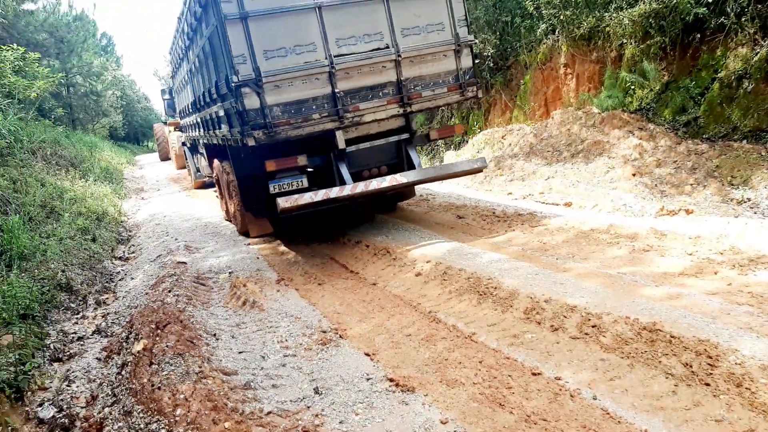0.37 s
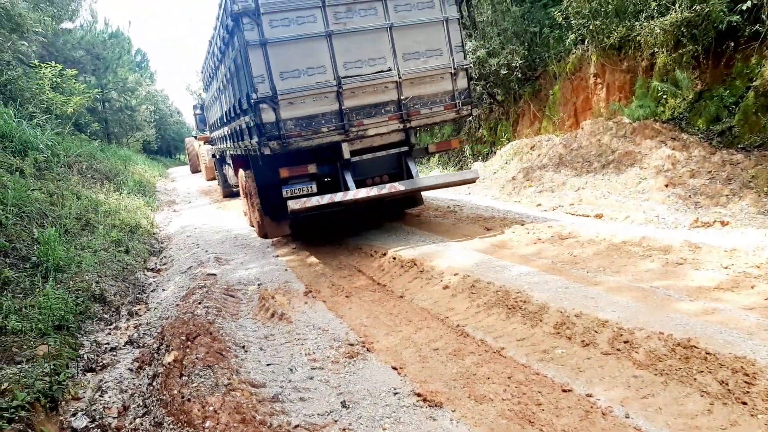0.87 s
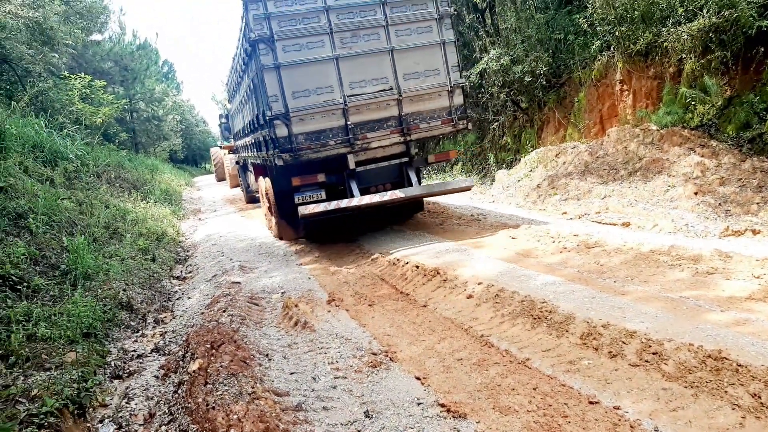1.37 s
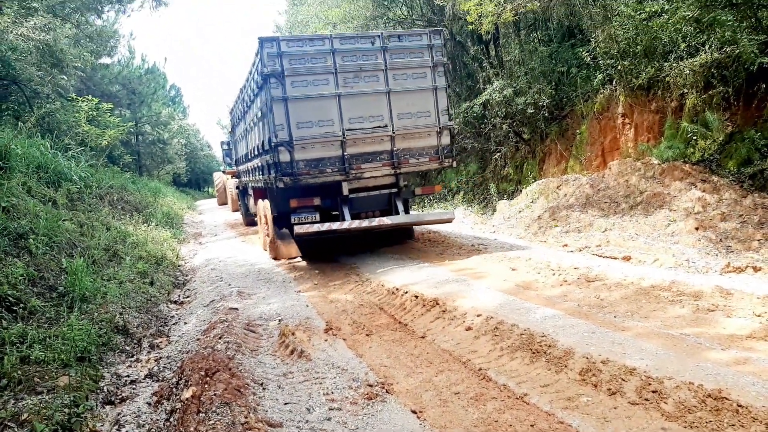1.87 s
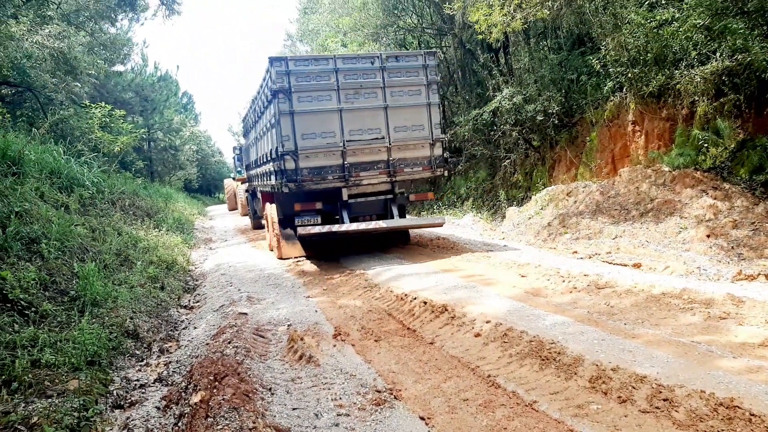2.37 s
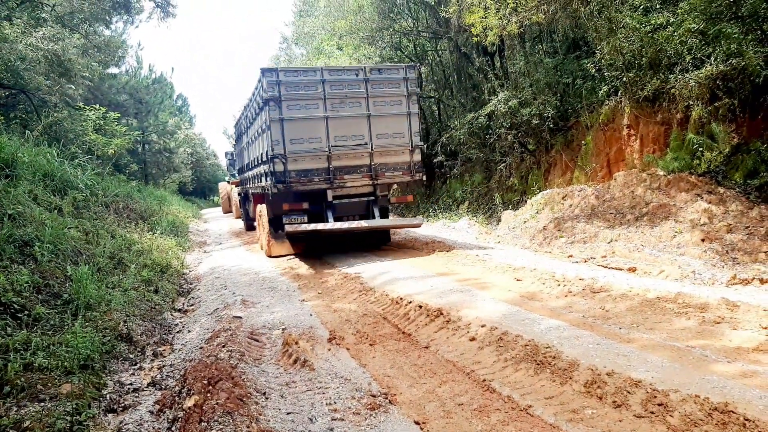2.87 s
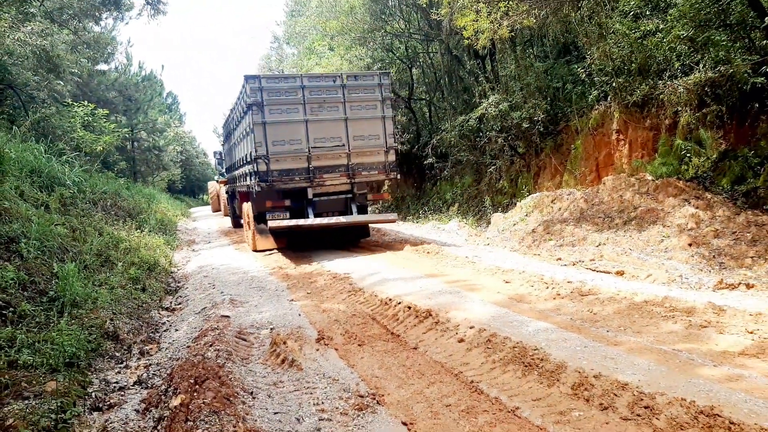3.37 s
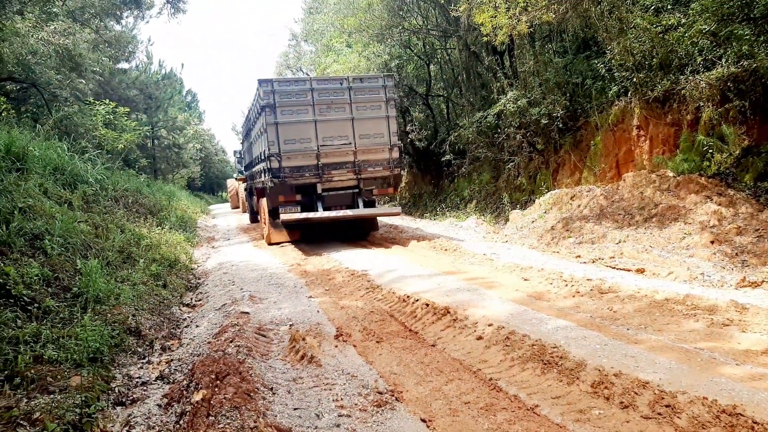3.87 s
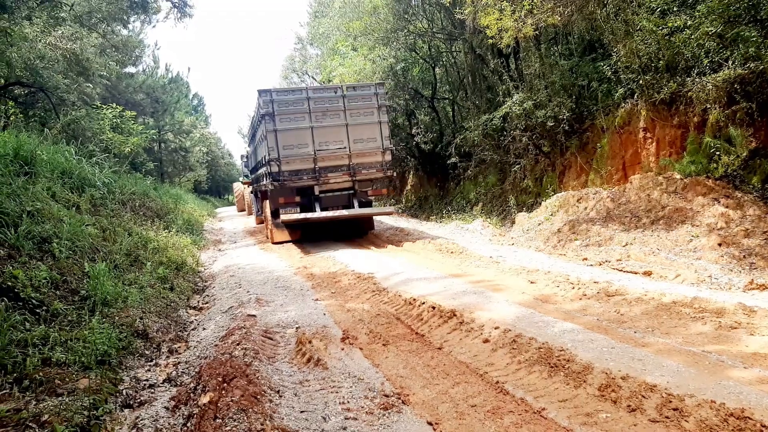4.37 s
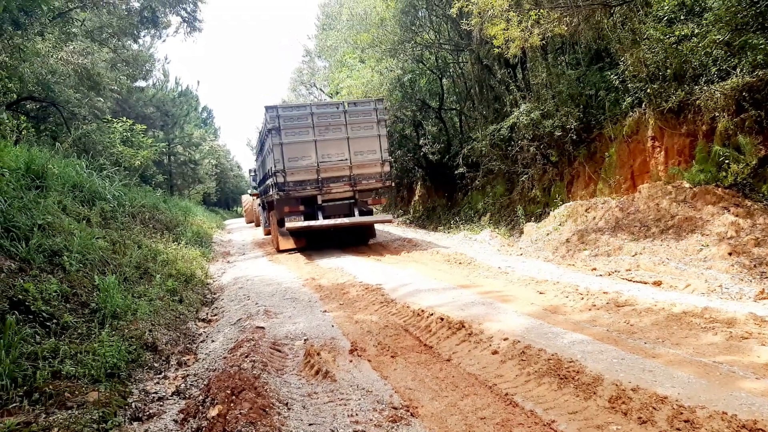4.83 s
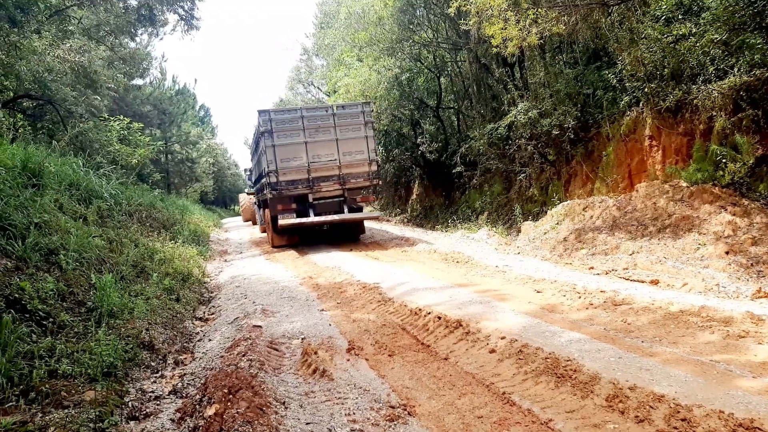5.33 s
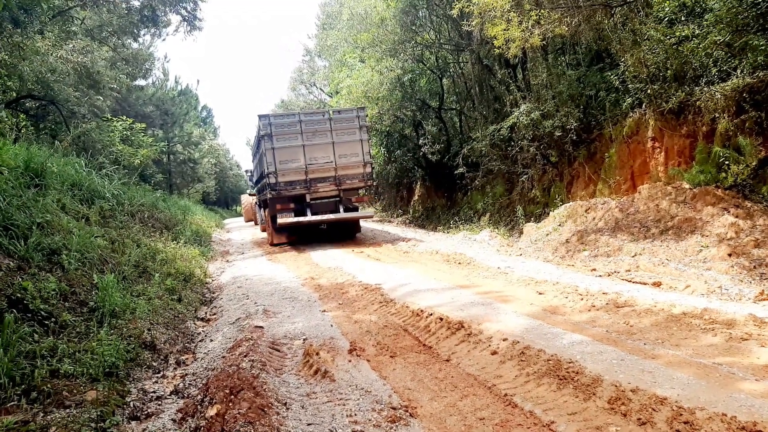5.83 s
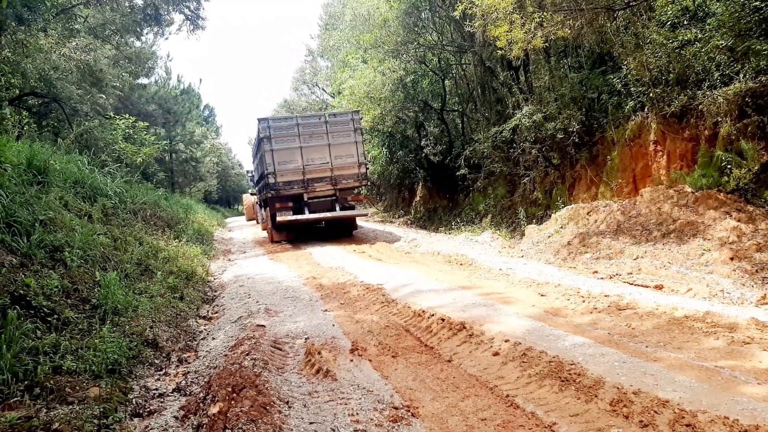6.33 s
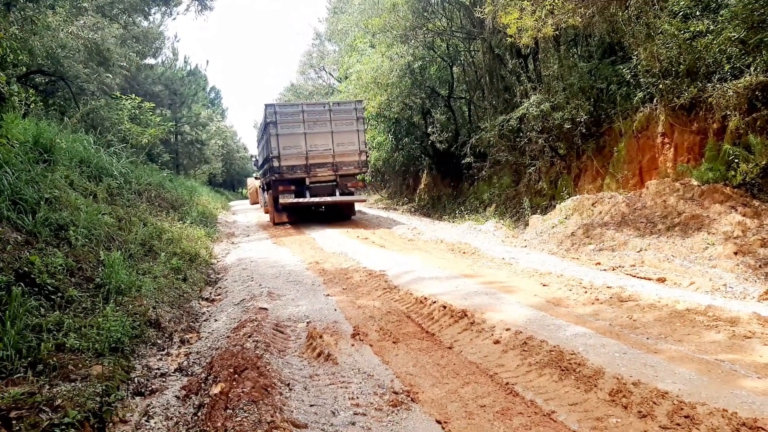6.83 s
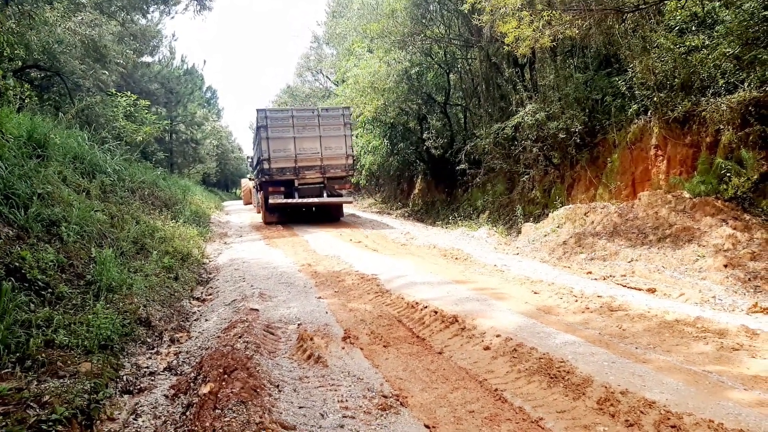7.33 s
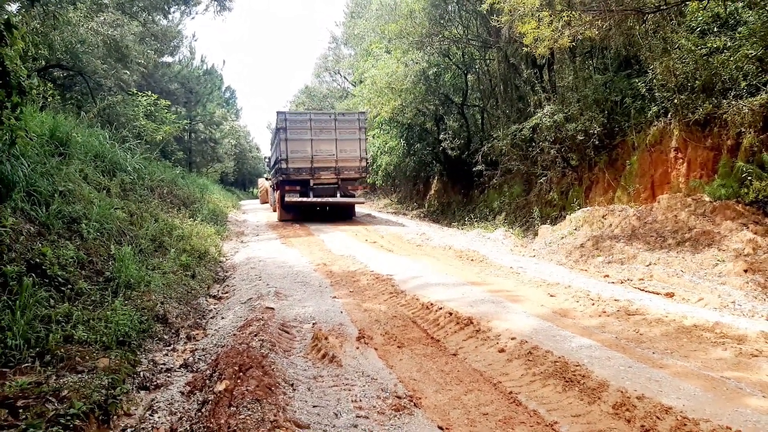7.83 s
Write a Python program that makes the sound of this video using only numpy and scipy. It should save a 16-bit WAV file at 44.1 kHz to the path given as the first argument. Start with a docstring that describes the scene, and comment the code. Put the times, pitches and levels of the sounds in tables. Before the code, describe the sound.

A loaded diesel truck's deep exhaust boom surges up and down as it is towed away over wet grit, clattering, hissing and squeaking.

```python
"""A loaded six-cylinder diesel truck's exhaust booms and surges as it is towed away up a dirt road
between a bank and trees: sines at multiples of a varying firing rate. The towing engine ahead holds
a steady high speed as sines on its crankshaft multiples. Patchy coloured noise makes rumble, roar,
clatter and the hiss of tyres in wet grit; narrow noise makes gear whines; short tones make squeaks,
decaying sines a clank and noise bursts rattles."""
import sys
import numpy as np
from scipy import signal
from scipy.fft import rfft, irfft
from scipy.io import wavfile
from scipy.ndimage import uniform_filter1d

SR = 44100
rng = np.random.default_rng(int(sys.argv[2]) if len(sys.argv) > 2 else 0)


def boost(x):
    """Linear amplitude factor 10**(x/20) for a level x in decibels (scalar or array-like)."""
    u = np.asarray(x, float) / 20
    return 10 ** u


def generate_wav(sig):
    """Save sig (samples, or channels by samples) to the path in sys.argv[1] as 16-bit PCM at SR."""
    pcm = np.round(np.clip(np.atleast_2d(sig).T, -1, 1) * 32767).astype(np.int16)
    wavfile.write(sys.argv[1], SR, pcm)


N = 351036  # samples


def in_time(rows):
    """Interpolates the columns of a time curve to every sample."""
    s, *columns = np.transpose(rows)
    return [np.interp(np.arange(N) / SR, s, column) for column in columns]


def at_hz(points, hz):
    """Reads a spectrum, given as (Hz, value) points, on a log-frequency axis."""
    point_hz, value = np.transpose(points)
    return np.interp(np.log(np.maximum(hz, 1)), np.log(point_hz), value)


def rms_one(x):
    """Scales to rms 1."""
    return x / np.sqrt(np.mean(x ** 2) + 1e-20)


def drift(rate_hz):
    """Slow random signal of rms about 1: noise through two equal poles at rate_hz."""
    step, settle = 40, 4000  # samples per slow value, slow values discarded
    r = np.exp(-2 * np.pi * rate_hz * step / SR)
    white = rng.standard_normal(N // step + settle + 2)
    slow = signal.lfilter([1], [1, -2 * r, r * r], white)[settle:]
    return np.interp(np.arange(N) / step, np.arange(len(slow)), rms_one(slow - slow.mean()))


def pair():
    """Spectra of two white noises, as alike as the two microphones hear the distant scene."""
    # Each row: frequency in Hz, left-right likeness from 0 to 1.
    likeness = [(60, .99), (160, .95), (270, .86), (450, .78), (740, .68), (1100, .35), (2500, .2),
                (3500, .04), (15000, .02)]
    mid, side = rfft(rng.standard_normal((2, N)))
    alike = np.clip(at_hz(likeness, np.fft.rfftfreq(N, 1 / SR)), 0, 1)
    return np.sqrt(1 + alike) * mid + np.sqrt(1 - alike) * side * [[1], [-1]]


def resonant_noise(white, centre_hz, width_hz):
    """Noise twice through a resonance, width_hz wide at half amplitude; rms 1."""
    hz = np.fft.rfftfreq(N, 1 / SR)
    return rms_one(irfft(white / (1 + (2 * (hz - centre_hz) / width_hz) ** 2), N))


def patchy_noise(colour, patchy_db, count):
    """Coloured stereo noise cut into overlapping bands that each flicker on their own; rms 1."""
    hz = np.fft.rfftfreq(N, 1 / SR)
    spectrum = pair() * boost(at_hz(colour, hz))
    place = np.interp(np.log(hz + 1), np.log([colour[1][0], colour[-2][0]]), [0, count - 1])
    out = 0
    for k in range(count):
        share = np.clip(1 - abs(place - k), 0, 1)
        out = out + irfft(spectrum * share, N) * boost(patchy_db * drift(11.0))
    return rms_one(out)


def line(turns, level_db, waver_db, wander_rad):
    """A sine of given rms whose level and phase waver on the way through the air."""
    level = np.sqrt(2) * boost(level_db + waver_db * drift(2.5))
    return level * np.sin(2 * np.pi * turns + wander_rad * drift(2.5))


def truck_exhaust():
    """The firing rate and its multiples, with weaker lines between them from unequal cylinders."""
    # Truck engine. Each row: time in seconds, firing rate in Hz, boom rms in dB.
    truck = [(0, 47.2, -23.5), (.28, 44.35, -23.5), (.54, 41.3, -27.5), (.75, 43.8, -22),
             (1.05, 49.04, -18), (1.3, 54.3, -19), (1.54, 61.8, -19.5), (1.85, 67.6, -24),
             (2.17, 71.6, -23), (2.45, 68.9, -21.5), (2.66, 69, -20), (2.92, 66, -20), (3.1, 63, -16),
             (3.42, 59.4, -16), (3.7, 65.9, -18), (3.98, 70.4, -26), (4.25, 66.2, -19), (4.6, 58.3, -16),
             (4.92, 51.83, -20), (5.25, 49.66, -26), (5.46, 51.3, -22), (5.64, 49.2, -28), (5.9, 53, -21.5),
             (6.16, 58.2, -17), (6.5, 62.1, -17), (6.75, 65.6, -18.5), (7.1, 56, -19.5), (7.3, 59.8, -19),
             (7.54, 66.46, -18.5), (7.8, 67.6, -19.5), (7.96, 70.8, -17.5)]
    # Exhaust pipe resonances favour the 2nd multiple.
    # Each row: frequency of the multiple in Hz, its rms in dB before the fade.
    pipe_second = [(84, -31), (95, -33), (105, -41.5), (115, -41), (124, -32.5), (134, -25), (143, -26)]
    # The same for the 3rd multiple. Each row: frequency in Hz, rms in dB before the fade.
    pipe_third = [(125, -34.5), (143, -32.5), (160, -33.5), (178, -33), (195, -40.5), (213, -38.5)]
    # Weaker lines: between the multiples from unequal cylinders, plus the fading 4th and 5th multiples.
    # Each row: sixths of the firing rate, rms in dB at the start, rms in dB at the end.
    weak_lines = [(4, -56, -60), (5, -50, -54), (7, -52, -52), (8, -48, -50), (10, -45, -48),
                  (14, -49, -50), (16, -45, -45), (24, -39, -80), (30, -44, -95)]
    second_fade_db, third_fade_db = -6.5, -9  # lost with distance by the end
    pulse_slant_turns = .38  # lead of the 2nd multiple: pulses rise slowly and drop fast
    firing_hz, boom_db = in_time(truck)
    turns = np.cumsum(firing_hz) / SR
    second_db = at_hz(pipe_second, 2 * firing_hz) + np.linspace(0, second_fade_db, N)
    third_db = at_hz(pipe_third, 3 * firing_hz) + np.linspace(0, third_fade_db, N)
    out = line(turns, boom_db, waver_db=.3, wander_rad=.05)
    out += line(2 * turns + pulse_slant_turns, second_db, waver_db=1.5, wander_rad=.2)
    out += line(3 * turns, third_db, waver_db=2.0, wander_rad=.3)
    for sixths, start_db, end_db in weak_lines:
        level_db = np.linspace(start_db, end_db, N)
        out += line(turns * sixths / 6, level_db, waver_db=4.0, wander_rad=.8)
    return out, turns


def towing_engine():
    """Crankshaft multiples of the governed engine ahead, its speed nearly steady."""
    # The 6th crankshaft multiple swells as the engine takes the load.
    # Each row: time in seconds, rms in dB.
    sixth_multiple = [(0, -43.5), (1.05, -36), (1.4, -36.5), (1.75, -52), (2.45, -51), (2.8, -36.5),
                      (3.45, -55), (3.85, -43), (5.25, -39.5), (6.3, -29.5), (6.65, -31.5), (7.35, -32.5),
                      (7.96, -36.5)]
    # Other multiples. Each row: crankshaft multiple, rms in dB at the start, rms in dB at the end.
    other_multiples = [(3, -44, -41.5), (4, -44, -55), (5, -57, -38.5), (8, -44.5, -53), (9, -44, -64.5)]
    crank_hz, firings_per_turn = 37.45, 3
    turns = np.cumsum(crank_hz * (1 + 0.002095 * drift(0.49))) / SR
    out = line(6 * turns, in_time(sixth_multiple)[0], waver_db=.6, wander_rad=.2)
    for multiple, start_db, end_db in other_multiples:
        level_db = np.linspace(start_db, end_db, N)
        out += line(multiple * turns, level_db, waver_db=3, wander_rad=.4)
    return out, firings_per_turn * turns


def low_rumble(swing_db):
    """Low noise that follows part of the slow swing of the clatter level."""
    # Each row: frequency in Hz, relative density in dB per Hz.
    colour = [(20, -1), (33, -2), (42, 7), (60, 10.5), (90, 9), (170, 12), (230, 6.5), (310, 3), (400, -9),
              (600, -26)]
    smooth_s = .6
    slow_db = uniform_filter1d(swing_db, round(smooth_s * SR))
    return boost(-34.5 + .6 * slow_db) * patchy_noise(colour, patchy_db=-0.25, count=4)


def exhaust_roar(swing_db):
    """Mid-low exhaust noise that follows part of the clatter's swing."""
    # Each row: frequency in Hz, relative density in dB per Hz.
    colour = [(220, -60), (380, -2.5), (499, 1.5), (586, 4.5), (863, -2), (1050, -12), (1360, -9),
              (2310, -120)]
    return boost(-40 + 0.73 * swing_db) * patchy_noise(colour, patchy_db=1.83, count=3)


def combustion_clatter(clatter_db, firing):
    """Mid-band noise pulsing slightly at each firing."""
    # Each row: frequency in Hz, relative density in dB per Hz.
    colour = [(590, -45), (1000, -3.5), (1510, -1), (1820, -3), (2020, -0.5), (2200, -4.5), (3100, -13.5),
              (4030, -45), (6820, -120)]
    return boost(clatter_db) * patchy_noise(colour, patchy_db=1.14, count=4) * firing


def tyre_hiss(hiss_db, firing):
    """Tyres in wet grit: high noise pulsing less at each firing than the clatter."""
    # Each row: frequency in Hz, relative density in dB per Hz.
    colour = [(1800, -4.5), (2800, 0), (3350, -2), (4210, 1), (5500, 1), (7200, -3.5), (8000, -9),
              (9000, -14.5), (10000, -28)]
    return boost(hiss_db) * patchy_noise(colour, patchy_db=0.98, count=4) * firing ** 0.58


def fine_spray(hiss_db):
    """The finest spray: top-band noise that dies faster with distance than the hiss below it."""
    # Each row: frequency in Hz, relative density in dB per Hz.
    colour = [(7000, -40), (8800, -8), (10300, -5.5), (11800, 2.5), (13000, -6), (15600, -9.5),
              (16500, -11)]
    spray_db = 1.6 * (hiss_db + 39.5) - 55
    return boost(spray_db) * patchy_noise(colour, patchy_db=2.0, count=3)


def whines():
    """Gear whines and panel rings: noise twice through narrow resonances, hoarse and wavering."""
    # Each row: frequency in Hz, width in Hz, level in dB at the start, level in dB at the end.
    resonances = [(508, 46, -49, -53), (1290, 26, -50.5, -52.5), (1530, 50, -44, -51), (2052, 34, -45, -51)]
    waver_db = 1.3
    white, out = pair(), 0
    for centre_hz, width_hz, start_db, end_db in resonances:
        level_db = np.linspace(start_db, end_db, N) + waver_db * drift(8.3)
        out = out + boost(level_db) * resonant_noise(white, centre_hz, width_hz)
    return out


def squeaks():
    """Stick-slip in the truck's body joints: short thin tones with a randomly walking phase."""
    # Each row: start in seconds, frequency in Hz, peak in dB.
    tones = [(.14, 4345, -36), (.265, 2460, -32), (.28, 2050, -33), (.315, 1025, -32), (.38, 2490, -35),
             (.385, 2050, -33), (.395, 4650, -39), (.43, 1850, -33), (.455, 4345, -39), (.46, 3530, -40),
             (.82, 5630, -40), (1.04, 4995, -38), (1.04, 3960, -38), (1.06, 4735, -39), (1.14, 1810, -33),
             (1.145, 4565, -41), (1.15, 6890, -44), (1.16, 2050, -33), (1.56, 680, -34), (2.25, 605, -36),
             (3.8, 2050, -39), (6.96, 1295, -36), (7.01, 600, -36)]
    n = round(0.056 * SR)  # tone length
    t = np.arange(n) / SR
    out = np.zeros(N)
    for start_s, hz, peak_db in tones:
        walk = np.cumsum(rng.standard_normal(n))
        i = round(start_s * SR)
        phase = 2 * np.pi * hz * t + .012 * walk
        out[i:i + n] += boost(peak_db) * np.hanning(n) ** .5 * np.sin(phase)
    return out


def clank():
    """Metal on metal: each tick is a broad short ring that sets the body's modes sounding."""
    # Each row: start in seconds, gain in dB.
    ticks = [(1.1008, -13), (1.1164, -8)]
    # Body modes. Each row: frequency in Hz, starting level in dB before the tick gain, t60 in seconds.
    modes = [(1295, -13, .09), (1550, -22, .07), (1770, -21, .07), (2300, -24, .07), (2590, -19, .13)]
    tick_hz, decay_s, rise_s = 1800, .0006, .0004
    out, t = np.zeros(N), np.arange(SR // 4) / SR
    blow = np.sin(2 * np.pi * tick_hz * t) * np.exp(-t / decay_s) * np.tanh(t / rise_s) ** 2
    for hz, level_db, t60_s in modes:
        blow = blow + boost(level_db - 60 * t / t60_s) * np.sin(2 * np.pi * hz * t)
    for start_s, gain_db in ticks:
        i = round(start_s * SR)
        out[i:i + len(t)] += boost(gain_db) * blow
    return out


def rattles():
    """The body rattles over ruts: bursts of rough noise in the panels' broad ring."""
    # Each row: centre in seconds, length in seconds, level in dB at the centre.
    bursts = [(4.527, 0.073, -37), (6.178, 0.17, -36), (7.002, 0.23, -37), (7.65, 0.15, -36.5)]
    t = np.arange(N) / SR
    ring = resonant_noise(pair(), centre_hz=1330, width_hz=560)
    swell = np.zeros(N)
    for centre_s, length_s, level_db in bursts:
        swell += boost(level_db) * np.cos(np.pi * np.clip((t - centre_s) / length_s, -.5, .5))
    return ring * swell * boost(-1.5 * drift(40.0))


def scene():
    """Both engines, the broad layers and the body noises; clatter and hiss pulse with the firing."""
    # Broad layers fade with distance and swell over ruts.
    # Each row: time in seconds, clatter level in dB, tyre hiss level in dB.
    broad = [(0, -33, -33.5), (.11, -32, -31.5), (.22, -33.5, -35.5), (.31, -31, -31), (.37, -32.5, -33.5),
             (.43, -29.5, -32), (.68, -34.5, -37.5), (.86, -32, -34), (.97, -32.5, -38.5),
             (1.12, -35, -33.5), (1.26, -33, -39), (1.45, -36.5, -40), (1.57, -32.5, -39),
             (2.1, -36, -40.5), (2.28, -34.5, -39.5), (2.66, -36.5, -40), (2.8, -33.5, -39),
             (3.04, -33.5, -38), (3.19, -37.5, -41), (3.54, -40, -43), (3.79, -38.5, -42.5),
             (5.3, -40, -43), (5.55, -39, -43), (6.2, -38, -40.5), (6.45, -40.5, -43), (6.61, -37.5, -42),
             (6.89, -40.5, -42.5), (7.0, -36.5, -41), (7.45, -38, -43), (7.67, -35.5, -41),
             (7.96, -37, -43.5)]
    mean_clatter_db = -36
    boom, truck_turns = truck_exhaust()
    hum, towing_turns = towing_engine()
    clatter_db, hiss_db = in_time(broad)
    swing_db = clatter_db - mean_clatter_db
    firing = boost(.8 * np.cos(2 * np.pi * truck_turns) + .4 * np.cos(2 * np.pi * towing_turns))
    out = boom + hum + low_rumble(swing_db) + exhaust_roar(swing_db)
    out = out + combustion_clatter(clatter_db, firing) + tyre_hiss(hiss_db, firing)
    out = out + fine_spray(hiss_db) + whines()
    return out + squeaks() + clank() + rattles()


def top_cut(x):
    """Nothing passes above the cut-off."""
    return signal.sosfilt(signal.butter(12, 15760, fs=SR, output="sos"), x)


def record(dry):
    """Two microphones that differ in colour and a little in place, with a notch from their ports."""
    # Each row: frequency in Hz, left over right in dB.
    left_right = [(60, -4.0), (99, -5.5), (160, -2), (270, -2), (450, -1.5), (740, -2), (1220, -5),
                  (2010, -7), (3330, 1), (5500, -7.5), (9080, 2.5), (15000, -3.5)]
    left_lead_s, lead_top_hz = .00017, 1500  # the phase lead grows no further above lead_top_hz
    notch_hz, notch_half_width_hz, notch_db = 8750, 250, -12
    hz = np.fft.rfftfreq(N, 1 / SR)
    half_lead = np.exp(1j * np.pi * np.minimum(hz, lead_top_hz) * left_lead_s)
    half = boost(at_hz(left_right, hz) / 2) * half_lead
    tilt = np.array([half, 1 / half]) * 2 / (abs(half) + 1 / abs(half))
    notch = boost(notch_db / (1 + ((hz - notch_hz) / notch_half_width_hz) ** 2))
    mix = irfft(rfft(dry) * tilt * notch, N)
    return top_cut(mix)


dry = scene()
out = record(dry)
generate_wav(out)
```